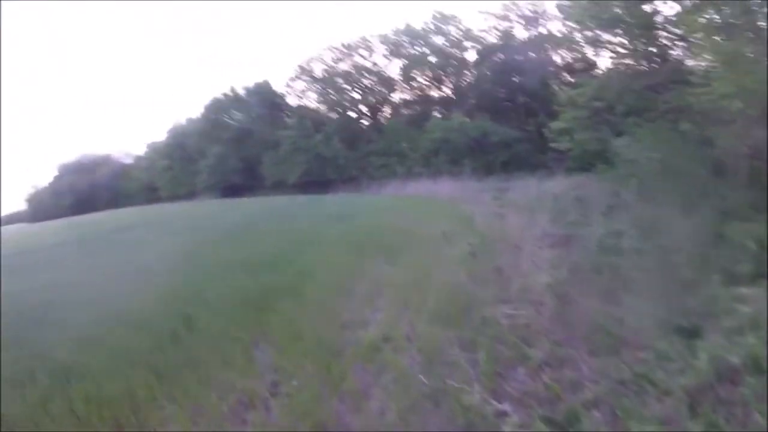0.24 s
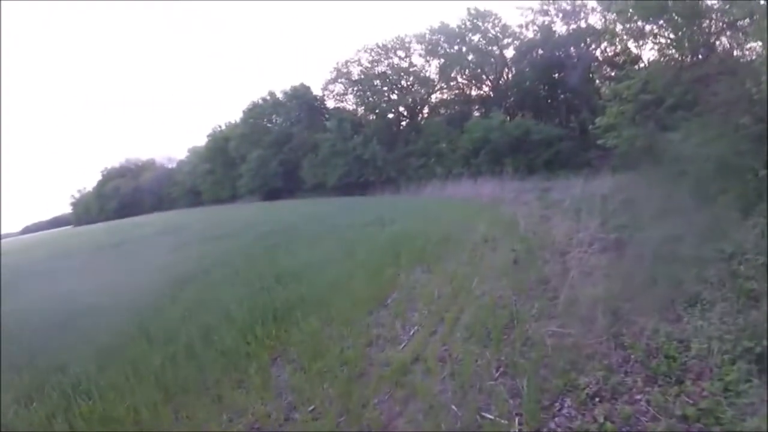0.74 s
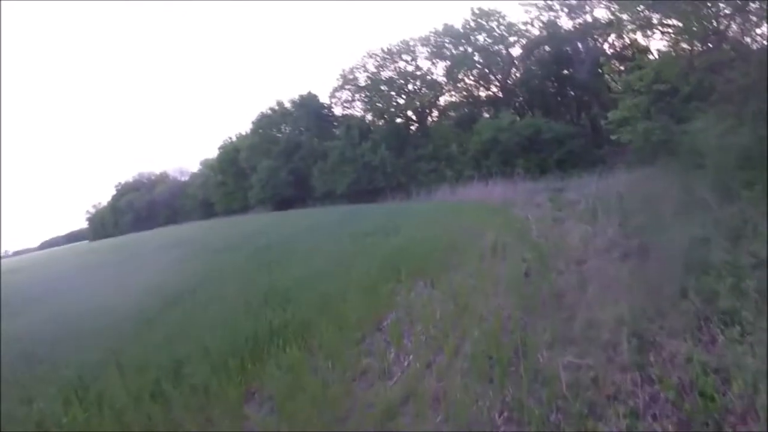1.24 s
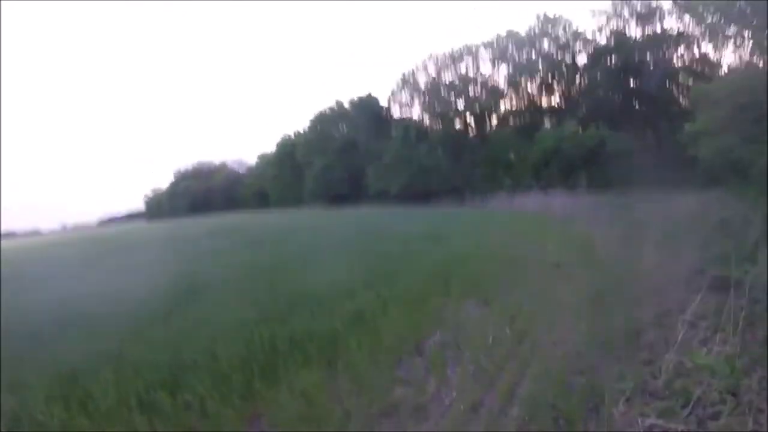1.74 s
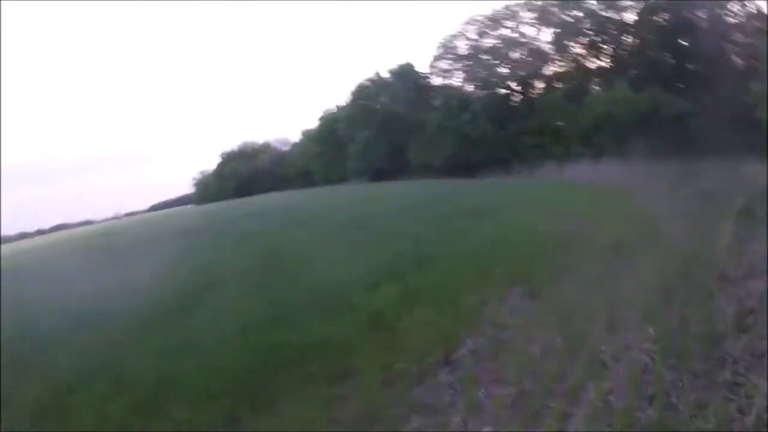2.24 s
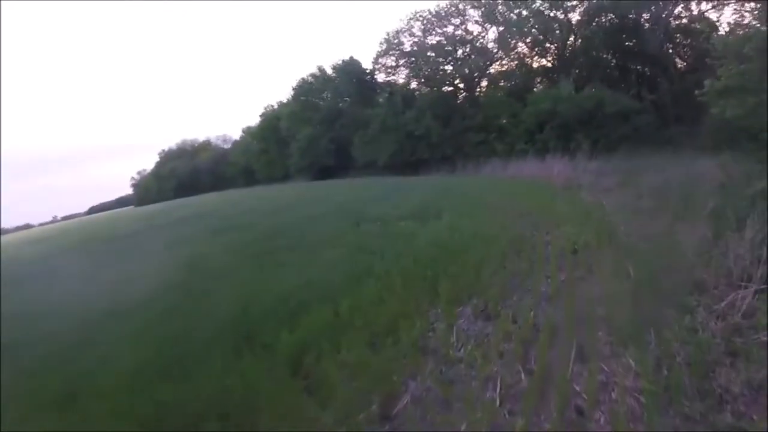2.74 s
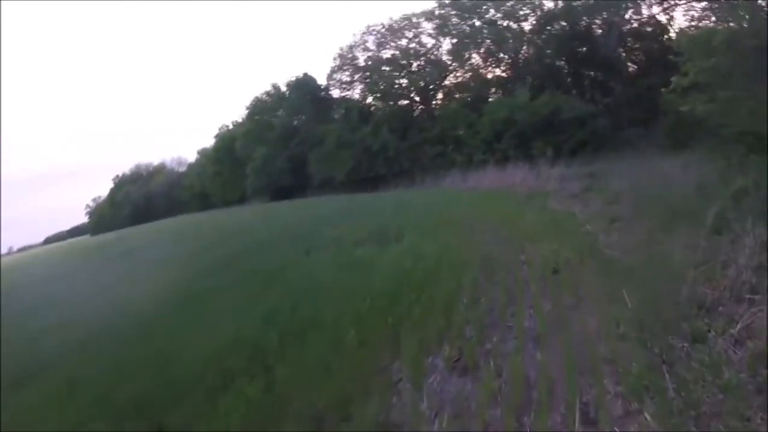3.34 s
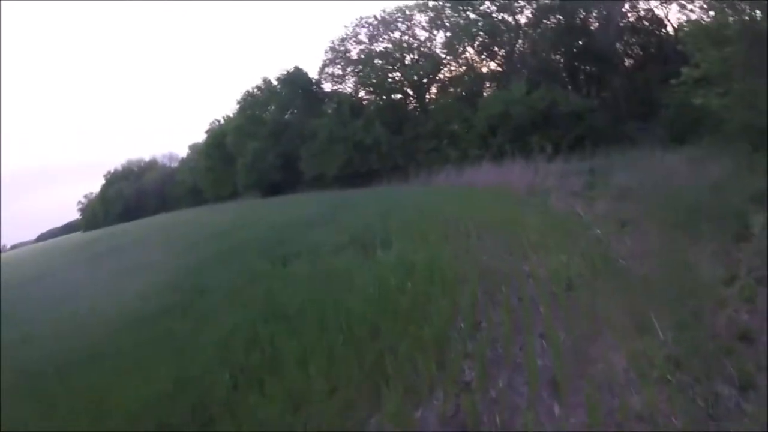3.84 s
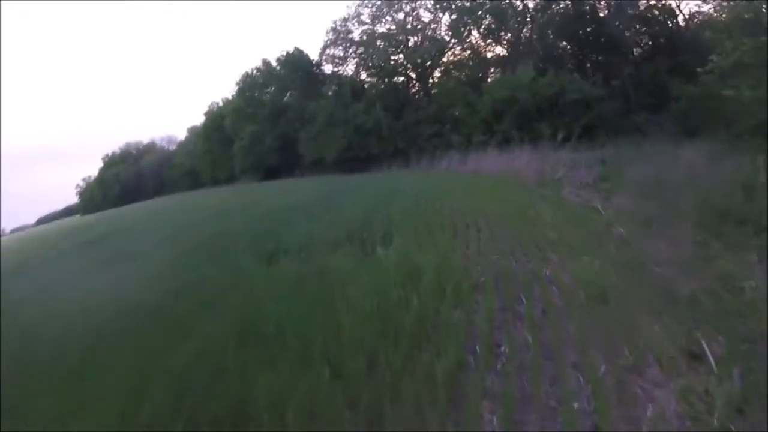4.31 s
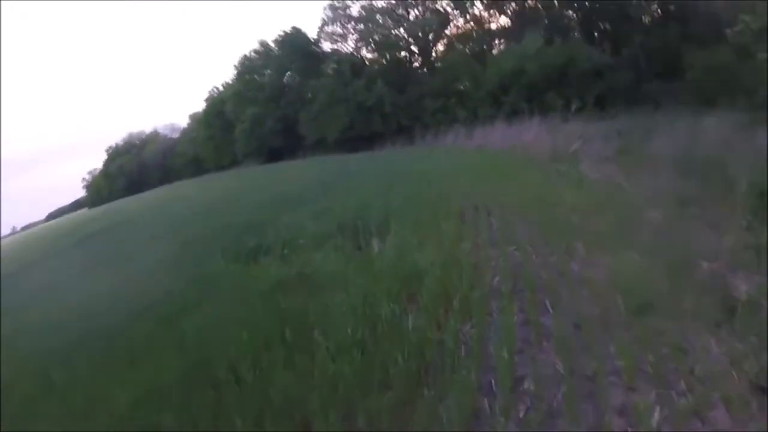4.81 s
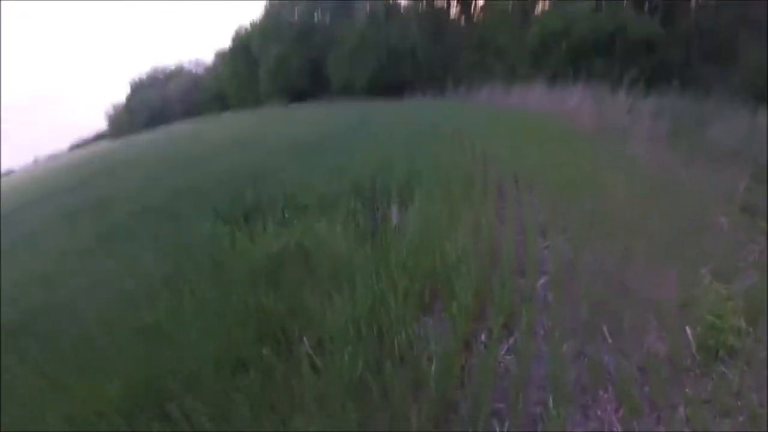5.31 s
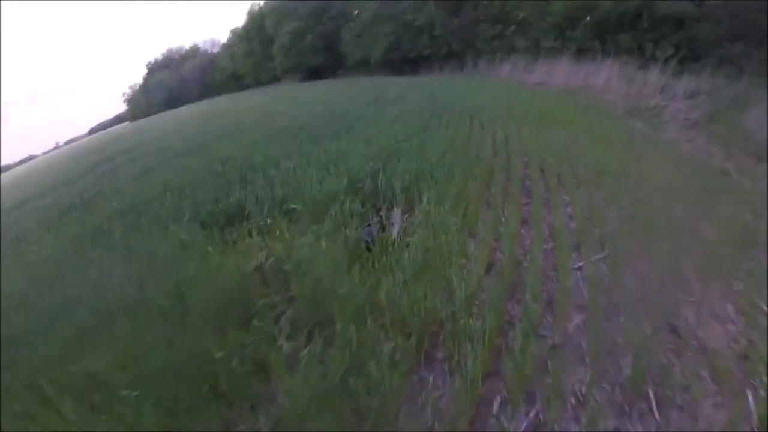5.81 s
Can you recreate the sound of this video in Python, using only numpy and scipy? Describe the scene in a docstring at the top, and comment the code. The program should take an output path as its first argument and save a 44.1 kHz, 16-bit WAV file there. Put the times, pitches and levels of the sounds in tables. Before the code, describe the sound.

A walker crosses a quiet grassy field with a small camera in a closed case. A distant bird chirps in quick gliding notes during the first second. Then dull, very low thumps come about every 0.6 seconds, with small hollow rattles, clothes rubbing and crisp grass swishes. The sound is close, boxy and mono, over faint hiss with tiny watery dropouts.

```python
"""A grassy field at dusk, crossed by a walker who carries a small camera in a closed case.
Air, grass and clothes are shaped noise; the case's port lifts the hiss in one narrow band.
Footfalls are damped low swings, bumps are short wave packets, and loose fittings ring decaying modes.
A far bird sings gliding near-sine notes at the start, with a scattered echo. Dry stalks snap as short ticks.
At moments the upper bands dip briefly while a few narrow bands stand out as tones."""
import sys
import numpy as np
from scipy import signal
from scipy.io import wavfile
from scipy.ndimage import uniform_filter1d

SR = 44100
rng = np.random.default_rng(int(sys.argv[2]) if len(sys.argv) > 2 else 0)


def store_wav(level_fs):
    """Save 16-bit WAV to argv[1]."""
    pcm = np.round(np.clip(np.atleast_2d(level_fs), -1, 1) * 32767)
    wavfile.write(sys.argv[1], SR, pcm.T.astype(np.int16))


def gain_from_decibels(decibels):
    """Convert decibel values to linear amplitude factors."""
    exponent = np.asarray(decibels, float) / 20
    return 10 ** exponent


N = 267378  # length in samples


def read(points, hz):
    """Spectral envelope: linear interpolation of level over log frequency."""
    point_hz, value = np.transpose(points)
    return np.interp(np.log(hz + 1), np.log(point_hz + 1), value)


def evened(x):
    """Normalisation: scales to an rms of 1."""
    return x / np.sqrt(np.mean(x ** 2) + 1e-20)


def add(mix, s, sound):
    """Superposition: mixes a sound in from time s."""
    part = mix[max(round(s * SR), 0):][:len(sound)]
    part += sound[:len(part)]


def noise(shape, patchy_db, flicker_db, size):
    """Filtered random noise: Gaussian short-time spectra with small patches and a flicker of all bands."""
    frames = 4 * N // size + 5
    hz = np.fft.rfftfreq(size, 1 / SR)
    real, imaginary, patches = rng.standard_normal((frames, len(hz), 3)).T
    patches = uniform_filter1d(patches, size=5, axis=0)
    patches = evened(uniform_filter1d(patches, size=5, axis=1))
    flicker = evened(uniform_filter1d(rng.standard_normal(frames), size=4))
    level_db = read(shape, hz)[:, None] + patchy_db * patches + flicker_db * flicker
    spectra = (real + 1j * imaginary) * gain_from_decibels(level_db)
    sound = signal.istft(spectra, nperseg=size, noverlap=3 * size // 4)[1]
    return evened(sound[:N])


# spectrum of the evening air, relative: frequency_hz, density_db (per Hz)
AIR_SPECTRUM = [(40, -35), (150, -13.5), (300, -10), (400, -8), (2600, -17), (3500, -20.5), (4150, -29.5),
                (5000, -28), (6000, -35), (6500, -25.5), (7000, -12), (10400, -25.5), (12100, -22.5),
                (13400, -27), (14800, -51)]


def evening_air():
    """Stationary broadband noise: a steady hiss with a fixed spectrum."""
    return gain_from_decibels(-62.5) * noise(AIR_SPECTRUM, 2.33, 0.091, size=1024)


# level of the rumble through time: time_s, level_db
SWAY_LEVEL = [(0, -50), (.5, -48), (.98, -45), (1.25, -48), (1.82, -47.5), (2.09, -48.5), (3.46, -45.5),
              (3.86, -51.5), (4.03, -43), (4.59, -51), (4.79, -42.5), (4.96, -47.5), (5.52, -51),
              (5.77, -46.5), (6.06, -45)]
# spectrum of the rumble, relative: frequency_hz, density_db (per Hz)
SWAY_SPECTRUM = [(12, -18), (25, -7.5), (48, 2), (75, -4), (110, -14.5), (170, -26), (300, -31),
                 (600, -101)]


def sway():
    """Amplitude-modulated low noise: the rumble of the swaying case."""
    level_db = np.interp(np.arange(N) / SR, *np.transpose(SWAY_LEVEL))
    return gain_from_decibels(level_db) * noise(SWAY_SPECTRUM, 2.53, 0.82, size=2048)


def snaps():
    """Impulsive excitation: dry stalks crack under the shoes as sparse three-cycle ticks, a few large."""
    out = np.zeros(N)
    snaps_per_s, bands = 300, 8
    for hz in np.geomspace(1500, 11000, num=bands):
        t = np.arange(round(3 * SR / hz)) / SR
        tick = np.sin(2 * np.pi * hz * t) * np.hanning(len(t))
        struck = rng.random(N) < snaps_per_s / bands / SR
        size = gain_from_decibels(2.33 * np.minimum(rng.exponential(1, N), 4)) * struck
        out += signal.oaconvolve(size, tick)[:N]
    return evened(out)


def wandering(level_db, wander_db):
    """Slow random modulation: a level that drifts about its middle value."""
    window_s = 0.04
    wander = uniform_filter1d(rng.standard_normal(N), size=round(window_s * SR))
    return gain_from_decibels(level_db + wander_db * evened(wander))


# legs brushing through taller grass: crest_s, grass_db, clothes_db, half_length_s (to 1/e)
BRUSHES = [(0, -52.5, -63, 0.037), (0.107, -55.5, -66, 0.038), (0.71, -65.5, -63, 0.037),
           (.9, -70, -61.5, 0.075), (1.607, -63.5, -61.5, .05), (2.11, -71, -61.5, .04),
           (2.41, -63, -59, 0.044), (2.79, -64, -64.5, 0.047), (2.962, -61, -74, 0.025),
           (3.147, -76, -63, 0.079), (3.973, -56.5, -59, 0.018), (4.08, -59.5, -66, .05),
           (4.605, -58.5, -62.5, 0.046), (5.156, -54, -60, 0.043), (5.264, -58, -58, 0.097),
           (5.646, -57, -57.5, 0.064), (5.795, -54, -56.5, 0.057), (5.929, -56.5, -57.5, 0.081)]
# spectrum of the grass, relative, with the port's narrow band: frequency_hz, density_db (per Hz)
GRASS_SPECTRUM = [(800, -64), (4000, -23.5), (5500, -5), (6200, -1.5), (6500, 14), (6900, -9), (8000, -5),
                  (10900, -15), (13000, -25), (14800, -53)]
# spectrum of rubbing clothes, relative: frequency_hz, density_db (per Hz)
CLOTHES_SPECTRUM = [(40, -68), (90, -51), (170, 5.5), (300, 2), (600, -3), (1300, -7), (2500, -18.5),
                    (5000, -30)]


def brushing():
    """Friction noise: Gaussian swells of grass swish, its snaps and lumpy rubbing of clothes."""
    t = np.arange(N) / SR
    grass = wandering(-65.5, 1)  # levels between the brushes
    clothes = wandering(-65, 2.5)
    for s, grass_db, clothes_db, half in BRUSHES:
        swell = np.exp(-((t - s) / half) ** 2)
        grass = np.hypot(grass, gain_from_decibels(grass_db) * swell)  # powers add
        clothes = np.hypot(clothes, gain_from_decibels(clothes_db) * swell)
    swish = noise(GRASS_SPECTRUM, 0.45, 0.53, size=256)
    rubbing = noise(CLOTHES_SPECTRUM, 3.44, 0.58, size=512)
    return clothes * rubbing + grass * (swish + gain_from_decibels(-10) * snaps())


# opening bird notes, one table a note: time_s, pitch_hz, level_db (rms)
BIRD_OPENING = [
    [(0, 5120, -55), (.013, 5460, -49), (.02, 4600, -68), (.04, 4060, -61)],
    [(.13, 2958, -70), (.15, 3500, -69), (.17, 4176, -61), (.185, 4500, -69), (.211, 5350, -54),
     (.222, 4400, -63), (.24, 3942, -62), (.247, 3900, -73)],
]
# notes of the repeated phrase, one table a note: time_s (from its start), pitch_hz, level_db (before gain)
BIRD_PHRASE = [
    [(0, 5700, -64), (.005, 6400, -51.5), (.009, 7200, -60)],
    [(.008, 5000, -60), (.014, 6000, -50.5), (.02, 7100, -53)],
    [(.021, 4850, -65), (.028, 5000, -56), (.034, 4850, -65), (.045, 3500, -68)],
    [(.07, 2750, -69), (.078, 3000, -66), (.09, 3390, -64), (.126, 3570, -64), (.17, 3604, -71.5),
     (.22, 3570, -76), (.29, 3574, -81)],
]
# times the phrase is sung: start_s, gain_db
PHRASE_STARTS = [(.335, 0.5), (.597, 0.3)]


def bird():
    """Frequency modulation and diffuse reflection: gliding near-sines with a faint echo from the trees."""
    out = np.zeros(N)
    notes = [(0, 0, note) for note in BIRD_OPENING]
    notes += [(start, db, note) for start, db in PHRASE_STARTS for note in BIRD_PHRASE]
    for start, db, note in notes:
        s, hz, level_db = np.transpose(note)
        t = np.arange(s[0], s[-1], 1 / SR)
        pitch_hz = uniform_filter1d(np.interp(t, s, hz), size=100, mode="nearest")
        tone = np.sin(2 * np.pi * np.cumsum(pitch_hz) / SR)
        tone *= signal.windows.tukey(len(t), 120 / len(t))  # soft ends
        # moving air blurs far notes
        waver_db = 1.5 * evened(uniform_filter1d(rng.standard_normal(len(t)), size=400))
        level = gain_from_decibels(db + np.interp(t, s, level_db) + waver_db) * np.sqrt(2)  # rms to peak
        add(out, start + s[0], level * tone)
    t = np.arange(SR // 2) / SR
    echo_t60_s, echo_delay_s = 0.6, 0.012
    echo = rng.standard_normal(len(t)) * gain_from_decibels(-60 * t / echo_t60_s) * (t > echo_delay_s)
    echo /= np.linalg.norm(echo)
    return out + gain_from_decibels(-8) * signal.fftconvolve(out, echo)[:N]


# knocks of loose fittings: start_s, peak_db, pitch_hz (favours nearby modes), ring_factor
KNOCKS = [(0.046, -48, 610, 6.3), (0.0659, -38, 760, 4.1), (.082, -47, 650, 1.5), (0.091, -43, 800, 1.5),
          (.454, -50.5, 590, 2.9), (.49, -49.5, 690, 4.6), (0.615, -49.5, 590, 4.2),
          (0.691, -46.5, 590, 2.7), (.725, -39, 455, 0.76), (1.059, -46, 404, 0.65), (1.79, -45, 303, 2.2),
          (2.094, -47, 900, 0.83), (2.105, -45.5, 1450, 0.72), (2.406, -45, 1710, 0.3),
          (2.425, -50, 1400, 1.1), (2.49, -48, 300, 13), (2.525, -45.5, 302, 21), (2.56, -40, 910, 0.78),
          (2.661, -48, 900, 1.4), (3.1603, -39, 900, 0.13), (3.595, -25, 286, 0.3), (3.95, -53, 600, 1.9),
          (2.93, -46.5, 290, 2), (4.181, -40.5, 250, 1.2), (4.786, -20.5, 378, 0.22),
          (4.947, -43.5, 544, 1.8), (4.965, -42, 530, 0.82), (5.168, -41.5, 690, 0.4),
          (5.226, -43.5, 800, 2.2), (5.261, -41.5, 556, 2), (5.361, -30.5, 800, 0.12),
          (5.768, -46, 596, 2.5)]
# modes the case rings with: frequency_hz, level_db (relative), t60_s (before the ring factor)
CASE_MODES = [(219, 2, 0.076), (297, 19, 0.0064), (590, 5, 0.012), (800, 5, 0.008), (1200, -11, 0.02),
              (1940, -65, .006)]


def knocks():
    """Modal excitation: each knock rings the damped modes of the case that lie near its own pitch."""
    out, t = np.zeros(N), np.arange(4000) / SR
    hz, mode_db, t60 = np.transpose(CASE_MODES)[:, :, None]
    rise_s = 0.0013
    rise = np.sin(np.pi / 2 * np.minimum(t / rise_s, 1)) ** 2
    for s, db, centre_hz, ring in KNOCKS:
        struck_db = mode_db - 15 * np.log2(hz / centre_hz) ** 2
        decay_db = 60 * t / (t60 * max(ring, 0.1))
        modes = gain_from_decibels(struck_db - decay_db) * np.sin(2 * np.pi * hz * t)
        sound = modes.sum(0) * rise
        add(out, s, gain_from_decibels(db) * sound / abs(sound).max())
    return out


# lighter bumps of the case between footfalls: crest_s, peak_db, pitch_hz, swings (cycles from crest to 1/e)
BUMPS = [(0.158, -34.5, 53.7, 0.19), (0.875, -33.5, 126, 0.34), (0.886, -36.5, 106, 0.85),
         (0.995, -36, 80, 0.87), (1.008, -32.5, 123, 0.65), (3.2126, -28, 86, 0.37), (3.701, -31, 31, 0.47),
         (4.151, -35.5, 26, 0.92), (4.275, -33, 30.3, 0.57), (4.892, -39, 45, 0.92),
         (4.919, -39.5, 89, 0.92), (5.446, -35, 21.3, 1), (5.745, -32, 73, 0.7), (5.922, -35.5, 60, 0.45),
         (6.024, -31.5, 28.8, .7)]


def bumps():
    """Gaussian wave packet: short low pushes that swell and fade around one crest."""
    out, t = np.zeros(N), np.arange(-3000, 3000) / SR
    for s, db, hz, swings in BUMPS:
        envelope = np.exp(-(t * hz / swings) ** 2)
        add(out, s + t[0], gain_from_decibels(db) * np.cos(2 * np.pi * hz * t) * envelope)
    return out


# footfalls: dip_s (deepest swing), level_db (of the fundamental), swing_hz (nominal),
# decay_s, rattle_db (relative to level_db)
FOOTFALLS = [(0.2009, -30.5, 22.2, 0.057, -29), (1.0703, -17.5, 26, 0.025, -28.5),
             (1.7909, -17.5, 26.2, 0.025, -30.5), (2.4033, -17.5, 23.2, 0.029, -32.5),
             (2.9436, -14.5, 23.4, 0.024, -37.5), (3.616, -14.5, 24.8, 0.022, -27),
             (4.2071, -13.5, 25.2, 0.019, -35.5), (4.806, -15, 25.7, 0.029, -30.5),
             (5.3124, -16.5, 22.9, 0.032, -30), (5.9478, -18.5, 24, 0.055, -45)]


def footfalls():
    """Damped oscillation: the case swings on its mount, builds up quickly, dips, then rebounds slower."""
    out, t = np.zeros(N), np.arange(-4410, 8820) / SR
    build_up_s = 0.029
    rounded = np.hypot(t, 0.004)  # |t| with a soft corner
    rattle_band = signal.butter(4, [70, 330], "band", fs=SR, output="sos")
    for s, db, hz, fall, rattle_db in FOOTFALLS:
        size = np.exp(-np.where(t < 0, (t / build_up_s) ** 2, (rounded - 0.004) / fall))
        turn = 2 * np.pi * hz * (t - 0.55 * t ** 2 - 0.2 * rounded)  # the swing slows down
        swing = -np.cos(turn) - 0.14 * np.cos(2 * turn) * size  # the stiff mount sharpens the dip
        add(out, s + t[0], gain_from_decibels(db) * size * swing)
        # the case rattles while it swings
        lumps = gain_from_decibels(4.3 * evened(uniform_filter1d(rng.standard_normal(len(t)), size=400)))
        shake = signal.sosfilt(rattle_band, rng.standard_normal(len(t)))
        add(out, s + t[0], gain_from_decibels(db + rattle_db) * size * evened(shake * lumps))
    return out


# single stalks that snap clearly: start_s (the crest follows about 1 ms later), peak_db
CRACKS = [(2.4848, -42), (2.9562, -49), (5.2594, -54), (5.2794, -55)]


def cracks():
    """Time-bandwidth reciprocity: a pulse of about one cycle is wide in spectrum."""
    out, t = np.zeros(N), np.arange(-40, 40) / SR
    pitch_hz, half_length_s = 4500, 0.0001
    pulse = np.cos(2 * np.pi * pitch_hz * t) * np.exp(-(t / half_length_s) ** 2)
    for s, db in CRACKS:
        add(out, s, gain_from_decibels(db) * pulse)
    return out


# the deepest moments when the hiss drops out: centre_s, depth_db
DIPS = [(.211, -21), (.492, -14), (.768, -14), (1.093, -28), (1.175, -16), (1.258, -27), (1.393, -16),
        (1.774, -24), (2.159, -18), (2.689, -16), (2.848, -14), (3.056, -19), (3.365, -19), (3.382, -19),
        (3.483, -14), (3.692, -19), (3.832, -28), (3.852, -28), (3.888, -19), (4.097, -18), (4.379, -18),
        (4.926, -27), (5.042, -14), (5.335, -24), (5.484, -19), (5.574, -18)]


def dropouts(x):
    """Time-varying filtering: upper bands dip for an instant while a few narrow ones become brief tones."""
    hz, t, z = signal.stft(x, SR, nperseg=512, noverlap=448)
    upper = np.clip(np.log2((hz + 1) / 450), 0, 1)  # fades in over one octave
    band = np.arange(len(hz)) // 2 * 2  # pairs of bins share one draw
    level = uniform_filter1d(abs(z[0]), size=9, axis=1)
    usual = np.median(level, axis=1)
    slight_dips, slight_dip_db = 14, -12  # shallow ones fall at random
    dips = DIPS + [(s, slight_dip_db) for s in rng.uniform(0, N / SR, slight_dips)]
    draws = rng.random((len(dips), len(hz)))
    # the loud port band often lasts
    spare_chance = 0.07 + 0.12 * (hz < 3000) + 0.45 * np.exp(-((hz - 6500) / 600) ** 2)
    dip_half_s, tone_half_s = 0.014 / 1.5, 0.014  # from centre to 1/e of the change in dB
    for (s, db), draw in zip(dips, draws):
        spared = draw[band] < spare_chance
        strong = level[:, np.argmin(abs(t - s))] > gain_from_decibels(11) * usual  # loud notes and knocks pass through
        dip_shape = np.exp(-((t - s) / dip_half_s) ** 4)
        tone_shape = np.exp(-((t - s) / tone_half_s) ** 4)
        dip_db = db * np.outer(upper * ~(spared | strong), dip_shape)
        tone_db = 5.14 * np.outer(upper * (spared & ~strong), tone_shape)
        z = z * gain_from_decibels(dip_db + tone_db)
    return signal.istft(z, SR, nperseg=512, noverlap=448)[1][:, :N]


def scene():
    """Linear superposition: the steady air, the walker, the bird and the case sum to one channel."""
    walker = sway() + brushing() + cracks()
    case = knocks() + bumps() + footfalls()
    return (evening_air() + walker + bird() + case)[None]


def band_limit(x):
    """A steep low-pass at the top of the band."""
    return signal.sosfilt(signal.butter(12, 14820, fs=SR, output="sos"), x)


def record(dry):
    """Signal chain: the brief dropouts act on the sum of all sources."""
    mix = dropouts(dry)
    return band_limit(mix)


dry = scene()
out = record(dry)
store_wav(out)
```